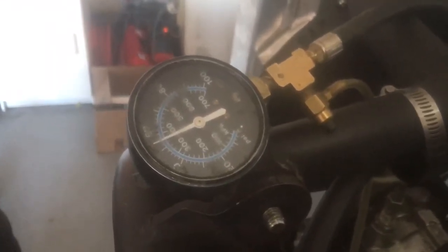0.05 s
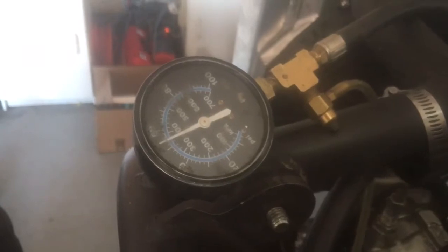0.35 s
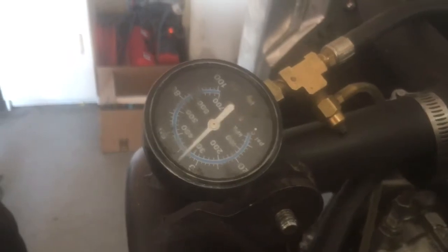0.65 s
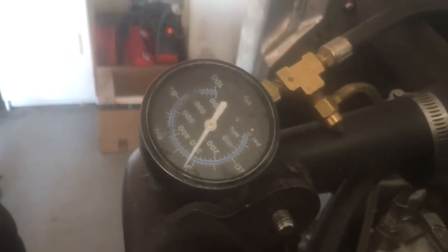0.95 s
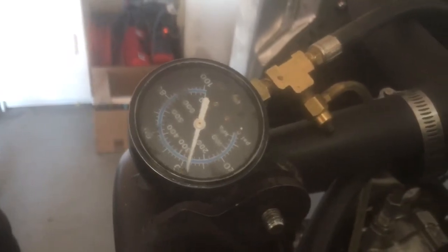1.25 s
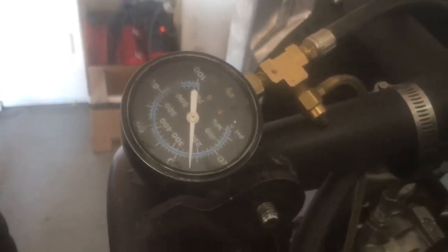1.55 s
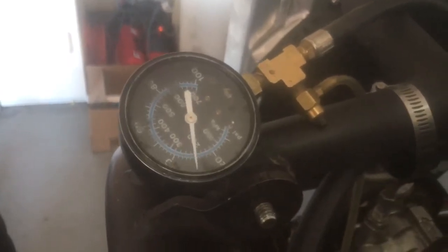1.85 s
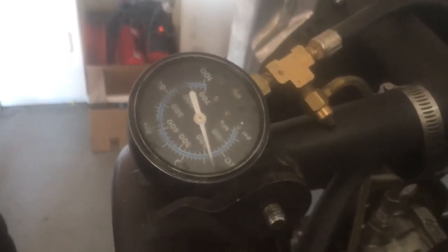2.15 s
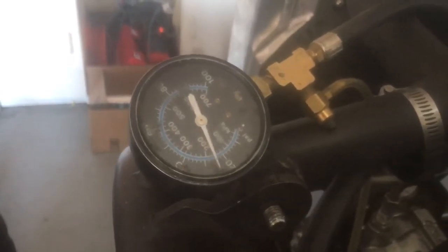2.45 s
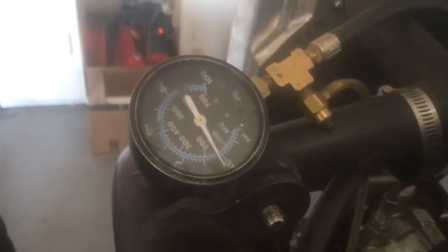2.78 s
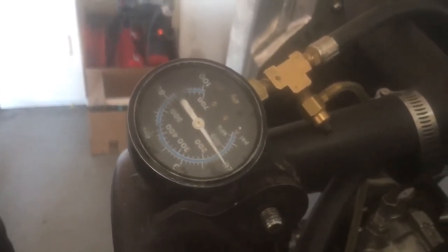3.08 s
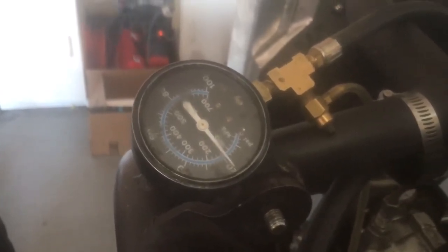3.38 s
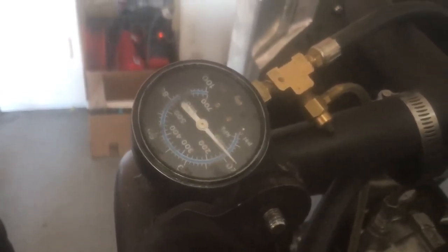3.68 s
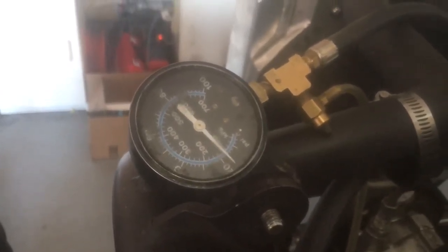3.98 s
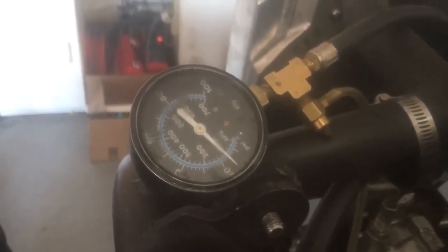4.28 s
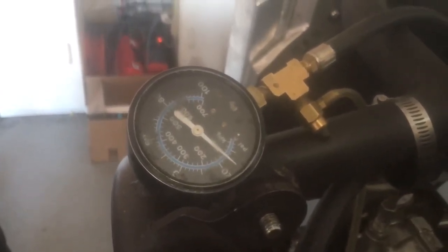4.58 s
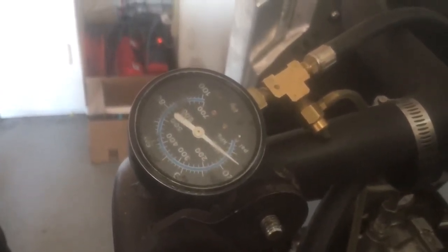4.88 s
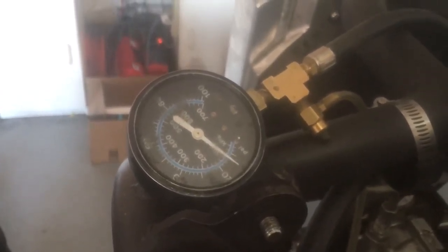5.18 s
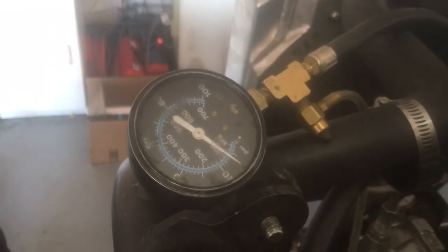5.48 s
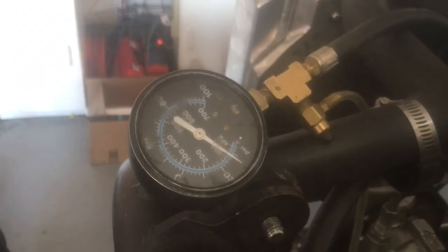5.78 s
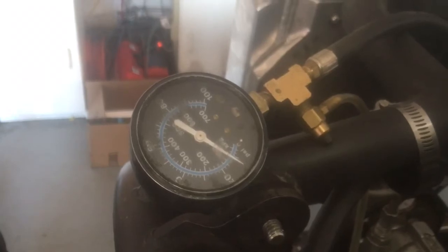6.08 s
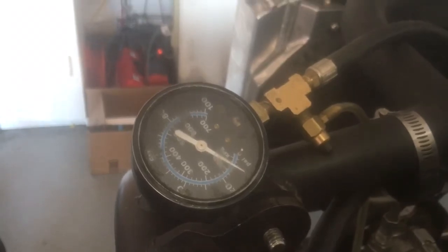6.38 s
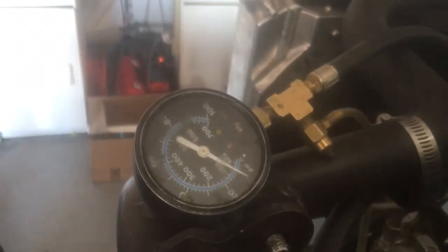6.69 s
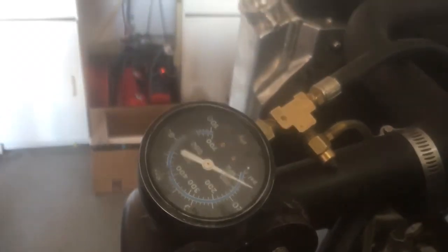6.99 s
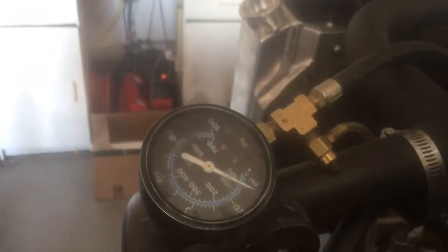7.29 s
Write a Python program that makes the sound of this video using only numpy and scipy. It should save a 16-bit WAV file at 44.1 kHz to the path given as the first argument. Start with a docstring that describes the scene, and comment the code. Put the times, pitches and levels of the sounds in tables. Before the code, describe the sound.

A four-cylinder engine idles fast and loud, close to the microphone in a small workshop, booming and rattling. Almost at once it is switched off and shudders to rest. Air rushes into the intake, ends in a tiny falling chirp and seeps away. For the remaining seconds it is quiet: a small fan hums low in the background, with a few faint ticks of cooling metal.

```python
"""Engine switched off in a workshop

One microphone, close walls. A four-cylinder engine at fast idle is switched off after half a second
and shudders to rest. Air rushes into its intake, ends in a falling chirp and seeps away. Behind it
a small fan hums on and slowly sags, hot metal ticks, and something ticks softly once a second."""
import sys
import numpy as np
from scipy import signal
from scipy.fft import rfft, irfft, next_fast_len
from scipy.io import wavfile

SR = 44100
rng = np.random.default_rng(int(sys.argv[2]) if len(sys.argv) > 2 else 0)


def master_out(mix):
    """Clip the mix to full scale and print it as 16-bit PCM to the path in sys.argv[1]."""
    frames = np.transpose(np.atleast_2d(mix))
    ceiling = np.clip(frames, -1, 1)
    pcm = np.round(ceiling * 32767).astype(np.int16)
    wavfile.write(sys.argv[1], SR, pcm)


N = 332514
TIME = np.arange(N) / SR

# Room tone. Each row: frequency in Hz, relative density in dB.
ROOM_TONE_SPECTRUM = [(90, 0), (150, -8), (260, -12), (400, -32), (800, -23.5), (1600, -31.5),
                      (2250, -33.5), (2600, -38.5), (4600, -39.5), (4900, -43.5), (6500, -42), (15500, -50)]
# Low modes of the workshop. Each row: frequency in Hz, width in Hz, relative level in dB.
WORKSHOP_MODES = [(59.1, 7.4, 0.5), (75.3, 9, -5)]
# Fan hum. Each row: multiple of the shaft rate, first relative level in dB, level it heads for in dB.
FAN_HARMONICS = [(4, -11.5, -9.5), (6, -.5, 1), (7, -7, -6), (8, -6.5, -3), (9, -10.5, -27), (10, -16, -30),
                 (11, -18.5, -31), (12, -15.5, -13), (14, -20, -20.5), (16, -20.5, -15.5)]
# Buzz of the fan housing. Each row: frequency in Hz, relative density in dB.
HOUSING_SPECTRUM = [(270, -1.5), (370, -1), (420, -2.5), (470, -3), (570, -2), (620, -4.5), (700, -1),
                    (790, -17.5), (1150, -12), (1400, -15.5)]
# Course of that buzz. Each row: time in seconds, relative level in dB.
HOUSING_LEVELS = [(1.3, -65.5), (1.52, -61.5), (1.82, -75.5), (2.13, -66), (2.98, -69.5), (3.21, -63),
                  (3.63, -70.5), (4.08, -62), (4.39, -68.5), (5.75, -75), (6.43, -67.5), (6.81, -73.5),
                  (7.35, -65), (7.54, -71)]
# Hot metal sizzling. Each row: centre in seconds, half length in seconds, ring in Hz, level in dB.
METAL_SIZZLES = [(4.3, 0.73, 2800, -86), (4.85, 0.38, 2100, -82)]
# Soft ticks a second apart. Each row: centre in seconds, level in dB.
SOFT_TICK_EVENTS = [(2.78, -76), (3.78, -78.5), (4.78, -80), (5.77, -77.5), (6.76, -75)]
# Their tone colour. Each row: frequency in Hz, relative density in dB.
SOFT_TICK_SPECTRUM = [(1200, 8), (2200, 3), (3200, 0), (4500, 3.5), (5200, -12), (10000, -21)]
# Short scuffs. Each row: start in seconds, level in dB, decay in seconds.
SCUFF_EVENTS = [(2.068, -55, 0.051), (3.093, -65, 0.012), (6.167, -69, .04)]
# Their tone colour. Each row: frequency in Hz, relative density in dB.
SCUFF_SPECTRUM = [(530, -42), (900, -7), (1310, -3), (1690, -5), (1810, 1), (2470, -1), (5400, -25.5),
                  (6340, -16), (14000, -38)]
# Clearest ticks of cooling metal. Each row: start in seconds, relative peak in dB, ring in Hz.
COOLING_TICKS = [(1.6167, -55, 2790), (1.717, -55, 2900), (1.915, -53.5, 2740), (2.0677, -52, 2540),
                 (2.1205, -51, 2300), (2.176, -55, 2380), (2.3087, -56, 2420), (2.6379, -62, 2370),
                 (2.6903, -61.5, 2270), (3.0615, -61, 2300), (4.573, -57.5, 2300), (6.1669, -62, 2460),
                 (6.7196, -63, 2650)]
# Gulps of intake air. Each row: centre in seconds, half length in seconds, relative level in dB.
AIR_GULPS = [(0.683, 0.084, -50), (0.97, 0.16, -51)]
# Jet of intake air. Each row: frequency in Hz, relative density in dB.
JET_SPECTRUM = [(880, -46), (1500, -3), (1860, 1.5), (2720, -0.5), (4270, 3.5), (4990, -5), (6430, 2),
                (7820, -2.5), (15500, -9)]
# Whistles of the narrow gap. Each row: frequency in Hz, width in Hz, relative level in dB.
GAP_MODES = [(5480, 320, 0), (6600, 370, -15), (8540, 250, 0), (11640, 600, -8)]
# Seeping air. Each row: frequency in Hz, relative density in dB.
SEEP_SPECTRUM = [(160, -17), (280, -13.5), (360, -2), (513, -24.5), (557, -8), (1040, -7.5), (1270, -4.5),
                 (2940, -15), (3780, -19), (10500, -33), (11800, -29), (15500, -40)]
# The hollow intake. Each row: frequency in Hz, width in Hz, relative level in dB.
INTAKE_MODES = [(1220, 84, 1), (1503, 100, -3.5), (1873, 68, -3.5), (2210, 150, -9.5)]
# Droning panels. Each row: pitch in Hz, centre in seconds, half length in seconds, level in dB.
PANEL_DRONES = [(126.6, 0.92, 0.16, -40.5), (243, 0.76, 0.11, -37.5), (285, 0.58, 0.11, -32),
                (78, 0.75, 0.1, -35.5), (54, 0.88, 0.084, -45)]
# Ring of the loose cover. Each row: frequency in Hz, width in Hz, relative level in dB.
COVER_MODES = [(885, 26, 1), (963, 82, -1.5), (1082, 31, -1), (1134, 32, -15)]
# Its hardest knocks. Each row: centre in seconds, relative level in dB.
HARD_KNOCKS = [(0.036, -32), (.186, -25.5), (.33, -28), (.425, -29.5), (.464, -24.5)]
# Ring of the engine block. Each row: frequency in Hz, width in Hz, relative level in dB.
BLOCK_MODES = [(586, 18, -8), (706, 8.5, -1.5), (773, 15, -6), (872.6, 24, 0.5), (1248, 15, -5.5),
               (1388, 17, -19), (1676, 110, -10), (1854, 82, -5.5), (2100, 30, -18), (3104, 38, -13.5),
               (3768, 100, -18.5)]
# Hiss of the valve gear. Each row: frequency in Hz, relative density in dB.
VALVE_SPECTRUM = [(600, -10.5), (780, -10), (900, -1), (1080, -7), (1200, -15), (1850, -8), (2700, -15),
                  (3160, -14), (5000, -19.5), (7800, -22.5), (9300, -20.5), (15500, -28)]
# Exhaust tones. Each row: multiple of the firing rate, relative level in dB.
EXHAUST_ORDERS = [(2, -8), (2.5, -10.5), (3, -7.5), (3.5, -6), (4, 0), (4.5, -11.5), (5, -11), (5.5, -14)]
# Exhaust puffs. Each row: frequency in Hz, relative density in dB.
PUFF_SPECTRUM = [(70, -16), (115, -5.5), (180, -5.5), (220, -6), (255, -12.5), (315, -10.5), (370, -22),
                 (425, -27), (465, -18.5), (510, -26), (560, -31.5)]

IDLE_FIRING_HZ, KEY_OFF_S, COAST_S = 55.4, .54, .55
FAN_BLADES, BLADE_FINAL_HZ, FAN_SAG_HZ, FAN_SAG_S = 6, 100.54, 8, 3.7
COOLING_FROM_S, COOLING_S = 2, .7
SEEP_FULL_S, VACUUM_GONE_S = 0.79, 1.396
CHIRP_S, CHIRP_HZ, CHIRP_REST_HZ, CHIRP_GLIDE_S = 1.133, 6650, 2490, .04
SQUEAK_HZ, SQUEAK_RISE_HZ_PER_S = 975, 5500
CUTOFF_HZ = 15750


def from_db(db):
    """Decibels to gain."""
    return np.exp(np.asarray(db) * (np.log(10) / 20))


def rms_one(x):
    """Scale to unit rms."""
    return x / np.sqrt(np.mean(x ** 2) + 1e-20)


def fade(s, db_per_s):
    """Gain that is 1 until a moment, then falls for two seconds."""
    return from_db(-db_per_s * np.clip(TIME - s, 0, 2))


def swell(s, half_s):
    """A smooth rise and fall about one moment."""
    return np.exp(-np.minimum(((TIME - s) / half_s) ** 2, 30))


def ramp(s, length_s):
    """An even rise from 0 to 1, starting at a moment."""
    return np.clip((TIME - s) / length_s, 0, 1)


def throb(hz, top_s):
    """A regular swing between -1 and 1."""
    return np.cos(2 * np.pi * hz * (TIME - top_s))


def white():
    """White noise."""
    return rng.standard_normal(N)


def drift(hz):
    """Smooth random wander of spread 1."""
    r = np.exp(-80 * np.pi * hz / SR)
    slow = signal.lfilter([1], [1, -2 * r, r * r], rng.standard_normal(N // 40 + 2002))[2000:]
    return np.interp(np.arange(N) / 40, np.arange(len(slow)), rms_one(slow))


def colour(x, spectrum):
    """Give a steady sound a spectrum with steep skirts; rms 1."""
    hz, db = np.transpose(spectrum)
    size = next_fast_len(N)
    octave, points = np.log2(np.fft.rfftfreq(size, 1 / SR) + 1), np.log2(hz)
    outside = np.abs(octave - np.clip(octave, points[0], points[-1]))
    gain = from_db(np.interp(octave, points, db) - 26 * outside)
    return rms_one(irfft(rfft(x, size) * gain, size)[:N])


def resonate(x, hz, width):
    """One resonance with gain 1 at its peak."""
    r = np.exp(-np.pi * width / SR)
    feedback = [1, -2 * r * np.cos(2 * np.pi * hz / SR), r * r]
    return signal.lfilter(np.array([1, 0, -1]) * (1 - r * r) / 2, feedback, x + 1e-18)


def body(x, modes):
    """Parallel resonances with deep valleys between them; rms 1."""
    return rms_one(sum(from_db(db) * rms_one(resonate(resonate(x, hz, 1.4 * width), hz, 1.4 * width))
                       for hz, width, db in modes))


def turn(hz):
    """Running phase of a rotation, from a random start."""
    return 2 * np.pi * (np.cumsum(hz) / SR + rng.random())


def harmonic(phase, k):
    """Phase of the k-th multiple of a rotation, from a random start."""
    return k * phase + 2 * np.pi * rng.random()


def strokes(phase, decay, uneven_db):
    """One decaying burst a cycle, each of its own strength; rms 1 over the first half second."""
    cycles = phase / (2 * np.pi)
    strength = from_db(uneven_db * rng.standard_normal(1024))
    burst = strength[cycles.astype(int) % len(strength)] * np.exp(-(cycles % 1) / decay)
    return burst / np.sqrt(np.mean(burst[:SR // 2] ** 2))


def contacts(cycles, alike):
    """Rattle of parts that meet partly the same way on every cycle, partly by chance."""
    size = 3000
    pattern = rng.standard_normal(size)[(cycles % 1 * size).astype(int) % size]
    return np.sqrt(alike) * pattern + np.sqrt(1 - alike) * white()


def room(x, t60, wet_db):
    """Close walls and metal send a short dense tail to the microphone."""
    t = TIME[:SR // 3]
    tail = rms_one(rng.standard_normal(len(t)) * from_db(-60 * t / t60) * (t > .002)) / np.sqrt(len(t))
    tail = signal.sosfilt(signal.butter(2, 500, "high", fs=SR, output="sos"), tail)
    return (x + from_db(wet_db) * signal.fftconvolve(x, tail)[:N]) / np.sqrt(1 + from_db(2 * wet_db))


def room_tone():
    """The workshop's low modes rumble over a faint hiss and swell once as the engine settles."""
    level = from_db(-58.5 + 0.9 * drift(3)) + from_db(-58) * swell(1.4, 0.27)
    rumble = level * body(white(), WORKSHOP_MODES)
    return rumble + from_db(-62.5) * colour(white(), ROOM_TONE_SPECTRUM) + from_db(-84.5) * white()


def housing_rattle(shaft):
    """High multiples of the shaft rate; two shakes a turn favour the even ones."""
    angle = np.linspace(0, 2 * np.pi, 2048)
    one_turn = sum(from_db(-4 * (k % 2) + rng.normal(0, 2.5)) * np.sin(harmonic(angle, k))
                   for k in range(17, 64))
    return np.interp(shaft % (2 * np.pi), angle, one_turn)


def fan():
    """In the background a slowing fan hums; every turn shakes its housing into a faint buzz."""
    blade_hz = BLADE_FINAL_HZ + FAN_SAG_HZ * np.exp(-TIME / FAN_SAG_S)
    shaft = turn(blade_hz * (1 + .002 * drift(3)) / FAN_BLADES)
    settled = ramp(3.6, 5.5)
    hum = sum(from_db(first + (last - first) * settled + drift(4.3))
              * np.sin(harmonic(shaft, k) + .5 * drift(0.81)) for k, first, last in FAN_HARMONICS)
    hum_db = -57 + 7 * swell(2.88, 1.62)
    shift = TIME + .5 * drift(0.95)   # the housing moves between two ways of rattling
    shaking = np.cos(shift) * housing_rattle(shaft) + np.sin(shift) * housing_rattle(shaft)
    buzz = from_db(-.5) * colour(shaking, HOUSING_SPECTRUM)
    buzz += from_db(-4.5) * colour(white(), HOUSING_SPECTRUM)
    buzz_db = np.interp(TIME, *np.transpose(HOUSING_LEVELS))
    return np.sqrt(2) * hum * from_db(hum_db - 1.5) + buzz * from_db(buzz_db - 1)


def sizzles():
    """Hot metal sizzles thinly for a moment."""
    return sum(from_db(db + 2.2 * drift(40)) * swell(s, half) * rms_one(resonate(white(), hz, 190))
               for s, half, hz, db in METAL_SIZZLES)


def scuffs_and_soft_ticks():
    """Grainy scuffs and a blurred tick once a second, off-mike: more reflection than direct sound."""
    rubs = sum(from_db(db) * (TIME > s) * np.exp(-np.abs(TIME - s) / decay)
               for s, db, decay in SCUFF_EVENTS)
    pulses = sum(from_db(db) * swell(s, 0.07) for s, db in SOFT_TICK_EVENTS)
    noises = rubs * colour(white(), SCUFF_SPECTRUM) + pulses * colour(white(), SOFT_TICK_SPECTRUM)
    return room(noises * from_db(3.35 * drift(90)), t60=0.032, wet_db=3)


def tick(s, db, hz, width_hz, snap_db, snap_s):
    """A tiny snap that rings briefly at its own pitch."""
    t, out, at = TIME[:SR // 8], np.zeros(N), round(s * SR)
    snap = rng.standard_normal(len(t)) * np.exp(-t / snap_s)
    ring = resonate(resonate(snap, hz, width_hz), hz, 2 * width_hz)
    sound = ring + from_db(snap_db) * resonate(snap, 3800, 4000)
    out[at:at + len(t)] = from_db(db) * sound / np.abs(sound).max()
    return out


def metal_ticks():
    """One tink as the engine rocks back, then crisp ticks that grow rarer as the metal cools."""
    events = list(COOLING_TICKS)
    for wait, size, pitch in rng.random(size=(8, 3)):   # faint ticks at random
        start_s = min(COOLING_FROM_S - COOLING_S * np.log(1 - wait), TIME[-SR // 4])
        events.append((start_s, -62 + 4 * (size - .5), 2420 * 2 ** (.7 * (pitch - .5))))
    cooling = sum(tick(s, db - 1, hz, width_hz=690, snap_db=-22.5, snap_s=0.0022)
                  for s, db, hz in events)
    tink = tick(s=.891, db=-37.5, hz=1190, width_hz=170, snap_db=-39, snap_s=0.0035)
    return room(cooling + tink, t60=0.07, wet_db=-11)


def closing_chirp():
    """The jet closes with a rough whistle that glides down towards a resting pitch."""
    glide = np.exp(np.minimum((CHIRP_S - TIME) / CHIRP_GLIDE_S, 1))
    hz = CHIRP_REST_HZ + (CHIRP_HZ - CHIRP_REST_HZ) * glide
    whistle = np.sqrt(2) * np.sin(turn(hz * (1 + .07 * drift(1500))))
    return whistle * from_db(-52 + 2.5 * drift(200)) * swell(CHIRP_S, 0.022)


def intake():
    """Air fills the vacuum: a bright jet whistles through a narrow gap, then a hollow seep remains."""
    # the seep builds as the engine slows, eases while the vacuum lasts, then dies away
    build = from_db(-53.5 - 43 * np.maximum(SEEP_FULL_S - TIME, 0))
    vacuum = build * fade(SEEP_FULL_S, 7) * fade(VACUUM_GONE_S, 22)
    rush = sum(from_db(db) * swell(s, half) for s, half, db in AIR_GULPS) + from_db(-14.5) * vacuum
    jet = rush * from_db(-.6 + 0.85 * drift(40))
    jet *= colour(white(), JET_SPECTRUM) + from_db(-11) * body(white(), GAP_MODES)
    seep = vacuum * from_db(1.1 * drift(33))
    seep *= from_db(-1) * colour(white(), SEEP_SPECTRUM) + from_db(-25) * body(white(), GAP_MODES[-1:])
    hollow = body(white(), INTAKE_MODES) * from_db(-67.5 + 2 * drift(20))
    hollow *= ramp(.2, 1) * fade(1.82, 11) * fade(2.36, 48)   # outlasts the hiss
    return room(jet + seep + hollow + closing_chirp(), t60=0.064, wet_db=-8.5)


def panels():
    """Panels drone one after another as the engine settles."""
    return sum(from_db(db) * swell(s, half) * np.sqrt(2) * np.sin(turn(hz * (1 + 0.0224 * drift(17))))
               for hz, s, half, db in PANEL_DRONES)


def loose_cover(cam, load):
    """The cover shakes at its own pace under load; hard knocks drag it into short rising squeaks."""
    shake = from_db(-40.5 + 5.5 * throb(hz=21.17, top_s=0.041)) * load
    knocks = squeaks = 0
    for s, db in HARD_KNOCKS:
        squeak_hz = SQUEAK_HZ + SQUEAK_RISE_HZ_PER_S * np.clip(TIME - s, -.05, .05)
        knocks += from_db(db - 7) * swell(s, 0.0085)
        squeaks += from_db(db - 7) * swell(s, .017) * np.sin(turn(squeak_hz))
    ring = body(contacts(cam, alike=0.47), COVER_MODES)
    return ring * (shake + knocks) + squeaks * from_db(2 * drift(120))


def valve_gear(phase, cam, surge_db):
    """The valve gear rattles the block and hisses, pulsing with the engine's strokes."""
    knocks = body(contacts(cam, alike=0.42), BLOCK_MODES)
    knocks *= 0.55 + .5 * strokes(phase, decay=0.9, uneven_db=1.5)
    hiss = colour(contacts(cam, alike=0.29), VALVE_SPECTRUM)
    hiss *= (0.42 + 0.3 * strokes(phase, decay=1, uneven_db=2)
             + 0.24 * strokes(2 * phase, decay=1, uneven_db=8.5))
    return from_db(-34 + 1.2 * drift(14.5)) * (from_db(-3) * knocks + from_db(surge_db - 0.5) * hiss)


def exhaust(phase, speed, surge_db):
    """Firings make rough throbbing tones; without ignition only ragged pumping is left."""
    tones = sum(from_db(db + 2.33 * drift(20)) * np.sqrt(2)
                * np.sin(harmonic(phase, k) + 0.52 * drift(6.1)) for k, db in EXHAUST_ORDERS)
    firing = fade(0.7, 40)
    puffs = colour(white(), PUFF_SPECTRUM)
    puffs *= 0.62 + 0.48 * firing * strokes(phase, decay=0.75, uneven_db=2)
    throb_db = 1.4 * firing * throb(hz=17.8, top_s=0.092)
    key_off_db = 3 * swell(KEY_OFF_S, 0.009) - 2 * ramp(KEY_OFF_S, .02)   # a last kick, then a drop
    flow = from_db(-21.5 + surge_db + throb_db + key_off_db) * fade(KEY_OFF_S, 39.5) * np.sqrt(speed)
    return flow * (from_db(-0.9) * tones * firing + from_db(.3 - 2.8 * firing) * puffs)


def engine():
    """Close to the microphone the engine booms at its firing rate, then loses speed ever faster."""
    speed = np.maximum(1 - ramp(KEY_OFF_S, COAST_S) ** 1.8, .1)   # share of idle speed
    phase = turn(IDLE_FIRING_HZ * speed)
    cam = phase / (8 * np.pi)   # camshaft turns, one for four firings
    surge_db = 2 * swell(0.43, 0.093)   # the idle swells just before key-off
    boom = np.sqrt(2) * np.sin(phase) * from_db(-25.5 + drift(6)) * fade(0.63, 127)
    firings = (boom + exhaust(phase, speed, surge_db)) * fade(0.86, 49)
    # the clatter fades from key-off and drops at once when the load goes
    load = fade(KEY_OFF_S, 39.5) * from_db(-6.5 * ramp(0.682, 0.031)) * fade(0.824, 170)
    clatter = valve_gear(phase, cam, surge_db) * load
    return firings + panels() + room(clatter + loose_cover(cam, load), t60=0.19, wet_db=-10.5)


def scene():
    """All sources at one microphone."""
    mix = engine() + intake() + fan() + metal_ticks() + scuffs_and_soft_ticks() + sizzles()
    return (mix + room_tone())[None]


def record(dry):
    """The highest treble is cut steeply."""
    return signal.sosfilt(signal.ellip(12, .1, 90, CUTOFF_HZ, fs=SR, output="sos"), dry)


dry = scene()
out = record(dry)
master_out(out)
```